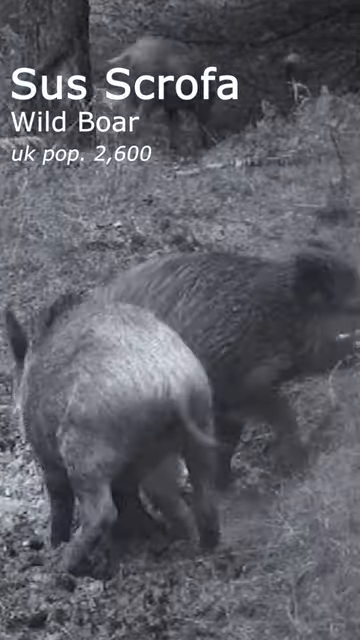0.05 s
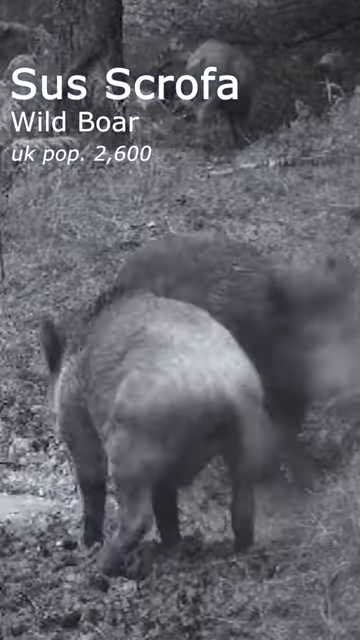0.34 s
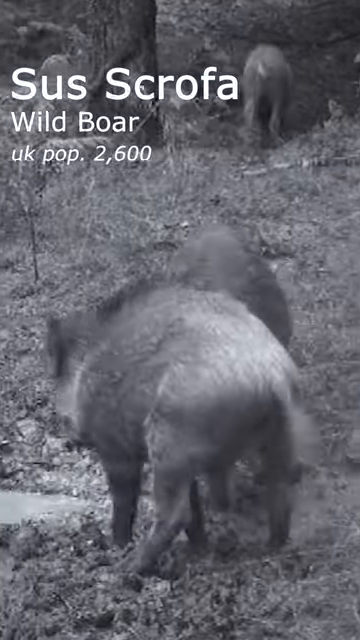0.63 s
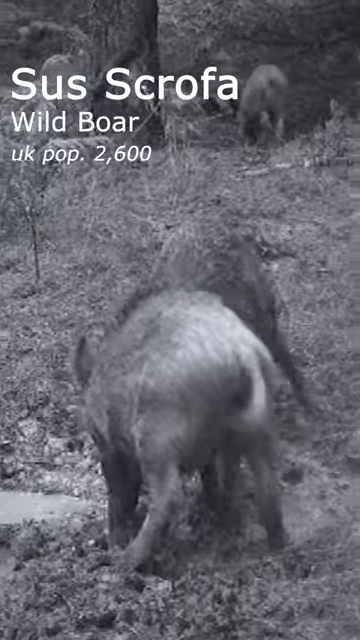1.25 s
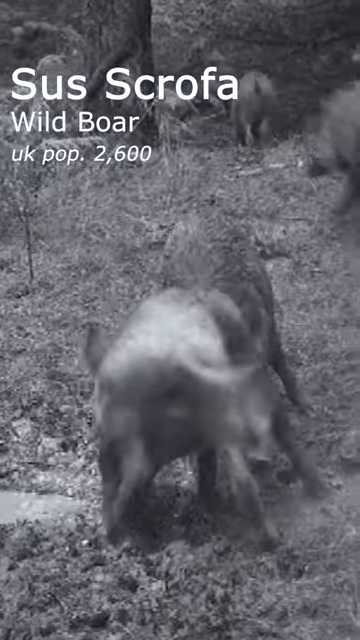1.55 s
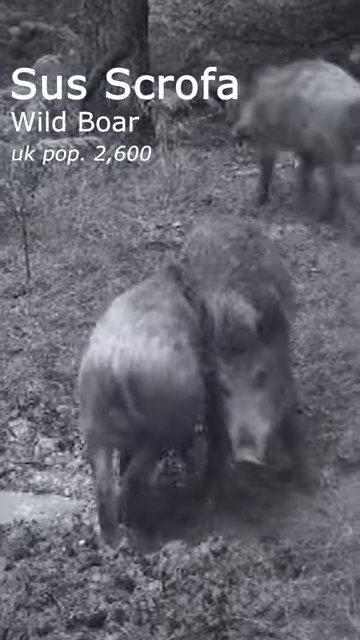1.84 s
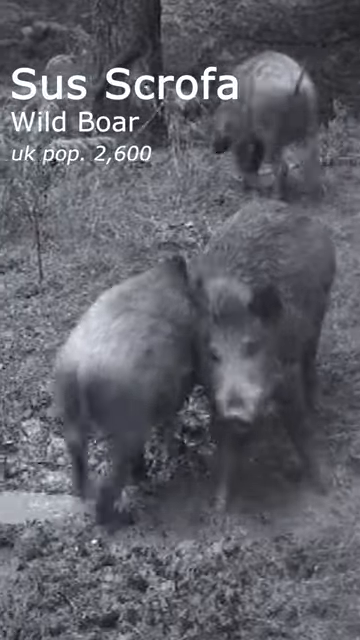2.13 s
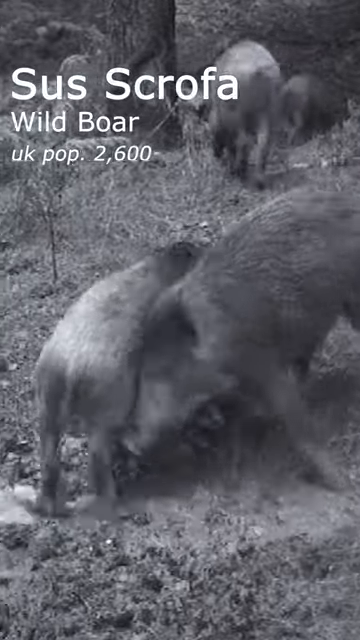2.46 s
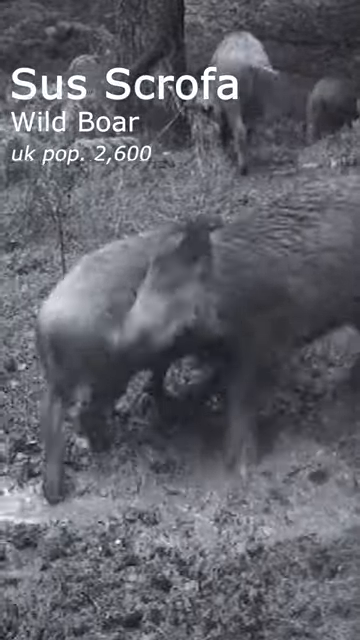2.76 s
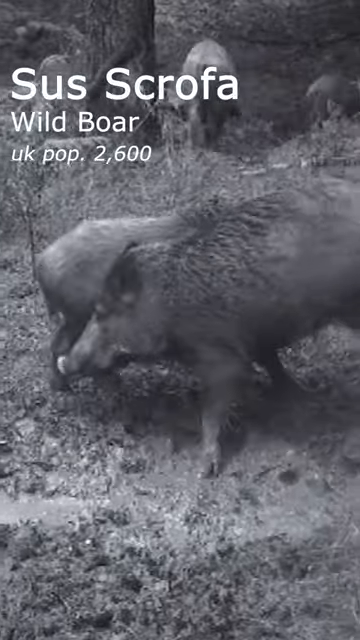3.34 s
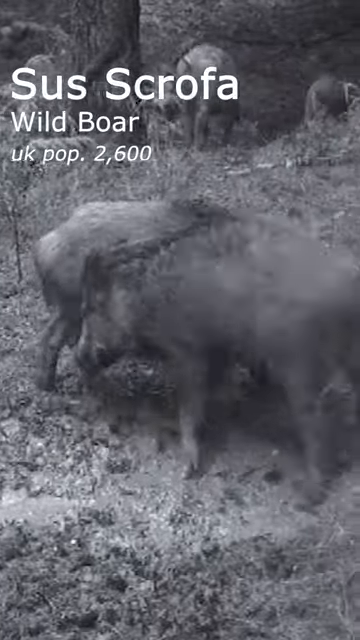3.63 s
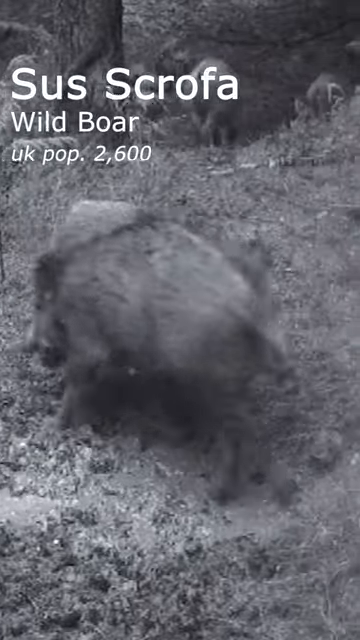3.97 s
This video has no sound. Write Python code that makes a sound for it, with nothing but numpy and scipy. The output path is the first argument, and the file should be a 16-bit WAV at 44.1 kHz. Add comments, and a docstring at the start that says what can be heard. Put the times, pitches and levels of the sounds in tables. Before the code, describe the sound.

Wild boars shift about nearby, breaking dry leaves and twigs in short bursts. A sharp snap comes early, then denser cracks, faint rustling and wet clicks of mud, while faraway birdsong echoes through the quiet forest air.

```python
"""Leaf litter crackles and mud pops as wild boars shift about in front of the microphone in a quiet forest.
Hooves break leaves and twigs in short, woody bursts, wet pockets click open as the mud lets go,
and one sharp snap rings out close by. Farther off, birds whistle and chirp, their notes smeared
by echoes from the trunks, over a soft hush of air and a low rumble that swells."""
import sys
import numpy as np
from scipy import signal
from scipy.fft import rfft, irfft
from scipy.io import wavfile
from scipy.ndimage import uniform_filter1d

SR = 44100
rng = np.random.default_rng(int(sys.argv[2]) if len(sys.argv) > 2 else 0)


def inscribe(sig):
    """Save sig as 16-bit PCM at rate SR to the path in sys.argv[1].

    A 1-D sig is mono; a 2-D sig holds one channel per row.
    Samples are clipped to [-1, 1] before scaling.
    """
    pcm = np.round(np.clip(np.atleast_2d(sig).T, -1, 1) * 32767)
    wavfile.write(sys.argv[1], SR, pcm.astype(np.int16))


N = 176400
LITTER_HZ = 4400  # woody ring of the forest floor


def undb(db):
    """Decibels to gain."""
    return 10 ** (np.asarray(db) / 20)


def unit(x):
    """Scale to rms 1."""
    return x / np.sqrt(np.mean(x ** 2) + 1e-30)


def curve(rows):
    """Gain over time from (t/s, level/dB) points."""
    return undb(np.interp(np.arange(N) / SR, *np.array(rows).T))


def per_bin(rows):
    """Spread (f/Hz, value) points over the spectrum on a log frequency axis."""
    hz, value = np.array(rows).T
    return np.interp(np.log(np.arange(N // 2 + 1) * SR / N + 1), np.log(hz), value)


def band(x, hz, width_hz):
    """A resonance with gain 1 at its centre."""
    return signal.lfilter(*signal.iirpeak(min(hz, .45 * SR), hz / width_hz, fs=SR), x)


def steep_band(x, hz, width_hz):
    """The same resonance twice over, for steeper skirts."""
    return band(band(x, hz, width_hz), hz, width_hz)


def walk(per_s):
    """Smooth random drift with rms 1."""
    span = int(SR / per_s)
    smoothed = uniform_filter1d(rng.standard_normal(N), span, mode="wrap")
    return unit(uniform_filter1d(smoothed, span, mode="wrap"))


def add(track, start, sound):
    """Mix a sound into a track at a time in seconds."""
    i = max(int(start * SR), 0)
    track[..., i:i + sound.shape[-1]] += sound[..., :max(N - i, 0)]


def wash(spectrum):
    """Coloured noise around the microphone, alike on both sides in the bass and diffuse in the treble."""
    # likeness of left and right: f/Hz, correlation
    likeness = [(110, 0.81), (280, 0.16), (1200, 0.41), (9000, .05)]
    correlation = per_bin(likeness)
    mid, side = rfft(rng.standard_normal((2, N))) * undb(per_bin(spectrum))
    mid = irfft(mid, N)
    side = irfft(side * np.sqrt((1 - correlation) / (1 + correlation)), N)
    return (mid + side * np.array([[1], [-1]])) / mid.std()


def air():
    """The steady, soft hush of forest air."""
    # spectrum of the hush: f/Hz, relative level/dB
    spectrum = [(25, 2.5), (107, -2.5), (152, -15), (198, -9), (274, -14.5), (684, -15.5), (1170, -10),
                (1710, -18), (2400, -20.5), (4150, -20.5), (5430, -25), (15500, -32)]
    return wash(spectrum) * undb(-44)


def rumble():
    """A low rumble that swells under the hush."""
    # spectrum of the rumble: f/Hz, relative level/dB
    spectrum = [(30, -6), (95, -1.5), (210, -12), (330, -25.5), (2000, -47)]
    # its swell: t/s, level/dB
    levels = [(1.45, -54.5), (1.68, -44), (1.87, -48.5), (2.05, -44.5), (3.1, -45.5), (3.6, -39.5),
              (3.85, -43.5)]
    return wash(spectrum) * curve(levels)


def trunk_echoes(x, build_s=.012, t60_s=.9):
    """Echoes scattered by trunks: they build up, then die away."""
    t = np.arange(SR) / SR
    noise = rng.standard_normal((3, SR))
    scatter = noise[:2] + .54 * noise[2]  # partly shared by left and right
    tail = scatter * (1 - np.exp(-t / build_s)) * np.exp(-np.log(1000) * t / t60_s)
    return signal.fftconvolve(x[None], unit(tail) / np.sqrt(SR), axes=1)[:, :N]


def bird_notes(notes, direct_db, echo_db, waver):
    """Wavering tones that glide through three pitches and echo among the trees."""
    out, drift = np.zeros(N), 1 + waver * walk(per_s=260)
    for start, length, first, middle, last, db in notes:
        u = np.linspace(0, 1, int(length * SR))
        glide = np.polyval(np.polyfit([0, .5, 1], [first, middle, last], 2), u)
        hz = glide * np.roll(drift, -int(start * SR))[:len(u)]
        fade = np.minimum(np.minimum(u, 1 - u) / .35, 1)  # 35 % of the note at each end
        swell = np.sin(np.pi / 2 * fade)
        add(out, start, undb(db) * swell * np.sin(2 * np.pi * np.cumsum(hz) / SR))
    return undb(direct_db) * out + undb(echo_db) * trunk_echoes(out)


def birds():
    """Distant song; notes from deeper in the wood reach the microphone mostly as echo."""
    # all five tables: t/s, length/s, start f/Hz, middle f/Hz, end f/Hz, relative level/dB
    whistles = [(.415, .105, 1940, 1850, 1800, -49.5), (.515, .085, 1890, 2100, 2040, -44),
                (.595, .12, 1985, 1900, 1960, -53), (.82, .13, 2130, 2115, 2030, -52),
                (1.085, .095, 1935, 2010, 2025, -45.5), (1.235, .085, 1975, 1915, 1850, -50),
                (1.94, .095, 2120, 2120, 2050, -50.5), (2.52, .2, 4610, 4660, 4625, -45.5)]  # fluting notes
    chirps = [(.905, .08, 6350, 6020, 5830, -56), (1.675, .055, 6890, 6880, 6860, -51),
              (1.85, .045, 7350, 7680, 7080, -52), (2.012, .037, 7080, 7240, 7000, -54),
              (2.33, .042, 7780, 7590, 7300, -50)]  # thin, high notes
    slurs = [(1.92, .17, 5350, 4850, 4870, -42)]  # a rough falling note
    far_notes = [(0, .11, 447, 422.5, 382, -53), (.365, .09, 4170, 4120, 4130, -53),
                 (1.64, .08, 4530, 4560, 4550, -54), (3.1, .3, 1630, 1745, 1800, -54.5),
                 (3.51, .12, 2230, 2120, 2050, -48), (3.62, .24, 2140, 2260, 2350, -45)]  # calls from deeper in the wood
    rasps = [(2.2, .09, 5400, 5130, 5200, -45.5), (2.41, .1, 3950, 3700, 3750, -49)]  # hoarse, buzzing notes
    return (bird_notes(whistles + chirps, direct_db=-1, echo_db=-2, waver=.005)
            + bird_notes(slurs, direct_db=1, echo_db=0, waver=.02)
            + bird_notes(far_notes, direct_db=-4, echo_db=4, waver=.022)
            + bird_notes(rasps, direct_db=-6, echo_db=4, waver=.055))


def litter(x, hz, tear_db):
    """Dry leaves and twigs: a woody ring plus the noise of tearing fibres, dulled by the damp ground."""
    ring = steep_band(x, hz, width_hz=800)
    tear = signal.sosfilt(signal.butter(3, [2650, 5570], "band", fs=SR, output="sos"), x)
    return unit(ring) + undb(tear_db) * unit(tear)


def rustle(ticks_per_s=400, spread_db=3):
    """Many tiny ticks of trodden litter, scattered left and right."""
    # rise and fall of the rustle: t/s, level/dB
    levels = [(0, -46), (.25, -63), (1.1, -63), (1.4, -55), (2.7, -51.5), (2.92, -55), (3.1, -52.5),
              (3.5, -61.5), (3.95, -51.5)]
    hit = rng.random(N) < ticks_per_s / SR
    size = undb(spread_db * np.minimum(rng.exponential(size=N), 3.5))
    polarity = rng.choice([-1, 1], N)
    sides = 1 + .45 * rng.standard_normal((2, N))
    return unit(litter(hit * size * polarity * sides, LITTER_HZ, tear_db=-7)) * curve(levels)


def scuffs():
    """Brief soft hisses as a boar brushes over dry leaves."""
    # brushing strokes: t/s, length/s, level/dB
    strokes = [(2.17, 0.09, -49), (3.335, 0.049, -50)]
    hiss = steep_band(rng.standard_normal((2, N)), hz=6700, width_hz=2400)
    swell = np.zeros(N)
    for start, length, db in strokes:
        add(swell, start, undb(db) * np.sqrt(np.hanning(int(length * SR))))
    return swell * unit(hiss)


def mud_pops():
    """Small wet pockets open with a dull click as the mud lets go of a hoof."""
    # mud pockets: t/s, peak level/dB, f/Hz, decay/s
    pockets = [(.0035, -18, 1460, 0.0016), (1.539, -35, 860, 0.0016), (2.1723, -25.5, 1500, 0.002),
               (2.7, -32.5, 2070, 0.0082), (2.751, -32, 2300, 0.004), (2.7762, -35.5, 1430, 0.0033)]
    out, t = np.zeros(N), np.arange(2048) / SR
    for start, db, hz, decay in pockets:
        burst = rng.standard_normal(len(t)) * np.exp(-t / decay)
        ring = steep_band(burst, hz, width_hz=.49 * hz)
        add(out, start, undb(db) * ring / np.abs(ring).max())
    return out


def cracks(usual_length_s=.007, crumble_db=-21, crumble_s=.025):
    """Leaves and twigs give way under hooves: short bursts of breaking fibres with a crumbling tail."""
    # breaks: t/s, peak level/dB, length/s, tearing level against the ring/dB
    breaks = [(0, -25, .0071, 2), (.1005, -27.5, 0.0011, -9), (.133, -19, 0.0023, -14),
              (.145, -30, .005, -4), (0.327, -35.5, 0.0075, 6), (0.409, -37, .01, -15),
              (1.553, -36, 0.017, -4), (2.165, -26, 0.012, -4), (2.195, -22.5, 0.0035, -2),
              (2.278, -30.5, 0.0026, -12), (2.648, -27.5, 0.0031, -4), (2.7402, -22, 0.0016, -1),
              (2.7493, -23.5, 0.0037, -4), (2.756, -23, .0048, -10), (2.773, -28, 0.0057, 4),
              (2.844, -24.5, 0.0122, -4), (2.991, -29.5, 0.0078, -13), (3.064, -28, 0.0018, 8),
              (3.075, -26.5, 0.033, -3), (3.8843, -21, 0.0054, -14)]
    out, t = np.zeros((2, N)), np.arange(4096) / SR
    for start, db, length, tear_db in breaks:
        noise = rng.standard_normal((3, len(t)))
        fibres = np.sign(noise[2]) + .12 * noise[:2]  # they lie a little apart, left and right
        rise = np.minimum(t / (.45 * length), 1) ** 2
        fall = np.exp(-(t / (.8 * length)) ** 2) + undb(crumble_db) * np.exp(-t / crumble_s)
        hz = LITTER_HZ * (usual_length_s / length) ** .045  # shorter cracks: thinner twigs, higher ring
        crack = litter(fibres * rise * fall, hz, tear_db)
        add(out, start, undb(db) * crack / np.abs(crack).max())
    return out


def snap(start_s=.9031, left_lag_s=.000021, attack_s=.00005, splinter_s=.0043, low_cut_hz=970):
    """One hard snap close to the microphone, with fine splintering; its ring reaches the right first."""
    # ringing modes: f/Hz, relative level/dB, t60/s
    modes = [(1360, -16, 0.0071), (1970, -20, .012), (3440, -8, 0.0029), (4100, -16.5, 0.015),
             (7520, 6.5, 0.0017), (14500, -4, .0014)]
    out, t = np.zeros((2, N)), np.arange(2048) / SR
    age = np.maximum(t - np.array([[left_lag_s], [0]]), 0)
    ring = sum(undb(db) * np.sin(2 * np.pi * hz * age) * np.exp(-np.log(1000) * age / t60)
               for hz, db, t60 in modes)
    ring *= 1 - np.exp(-age / attack_s)
    hiss = band(rng.standard_normal(len(t)), hz=6700, width_hz=5100)
    splinters = unit(hiss) * np.exp(-t / splinter_s)
    add(out, start_s, undb(-4.5) * ring + undb(-30) * splinters)
    return signal.sosfilt(signal.butter(4, low_cut_hz, "high", fs=SR, output="sos"), out)


def scene(right_over_left_db=1.06):
    """Boars near the microphone, birds beyond them, all leaning a little to the right."""
    song = birds()
    boars = cracks() + rustle() + scuffs() + mud_pops() + snap()
    balance = undb(np.array([[-.5], [.5]]) * right_over_left_db)
    return (air() + rumble() + song + boars) * balance


def record(dry, top_hz=15900):
    """The recorder cuts the highest treble steeply."""
    return signal.sosfilt(signal.ellip(8, .2, 70, top_hz, fs=SR, output="sos"), dry)


dry = scene()
out = record(dry)
inscribe(out)
```